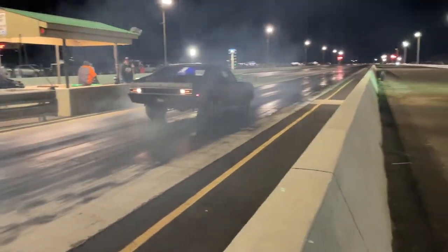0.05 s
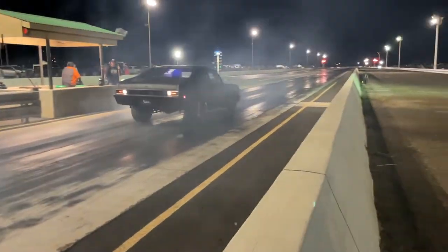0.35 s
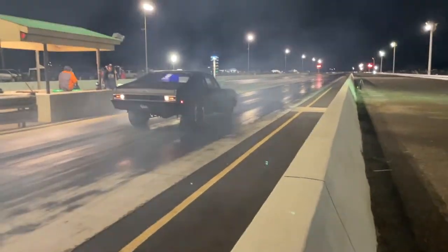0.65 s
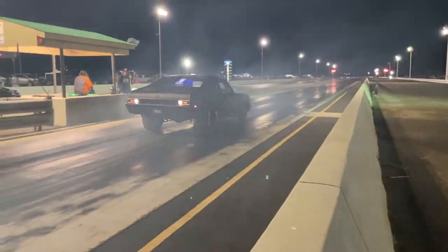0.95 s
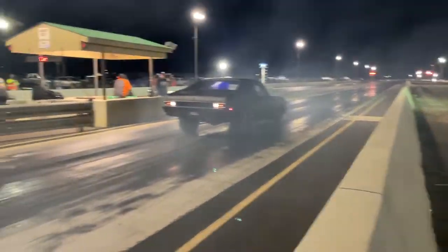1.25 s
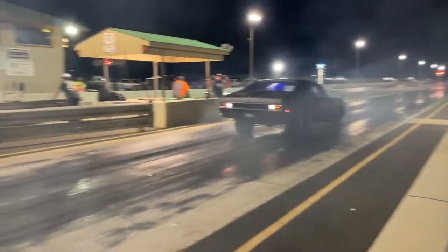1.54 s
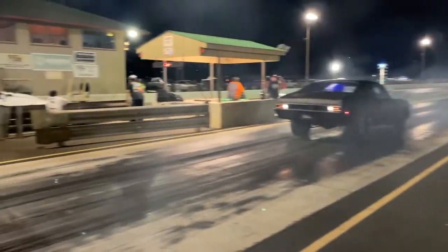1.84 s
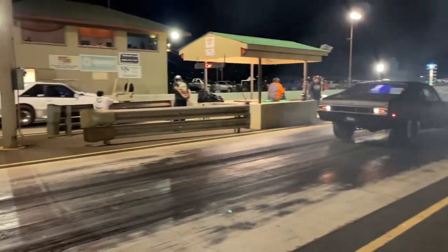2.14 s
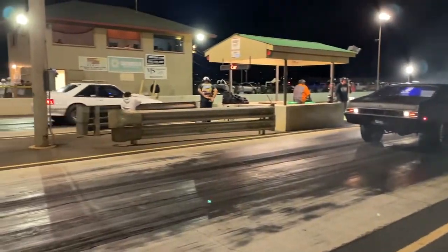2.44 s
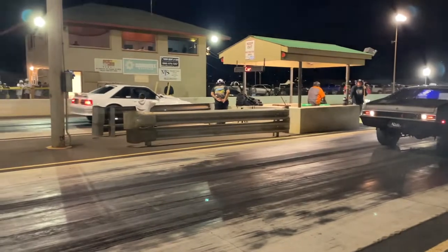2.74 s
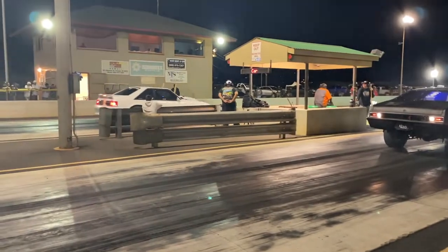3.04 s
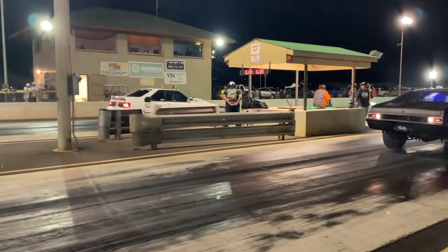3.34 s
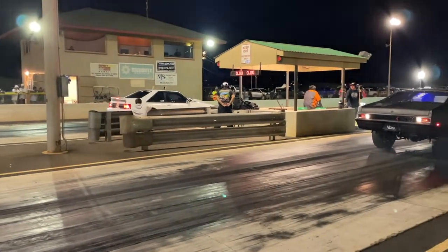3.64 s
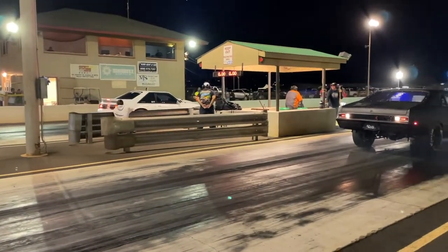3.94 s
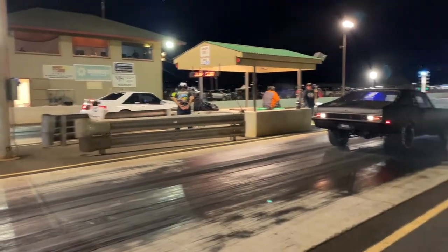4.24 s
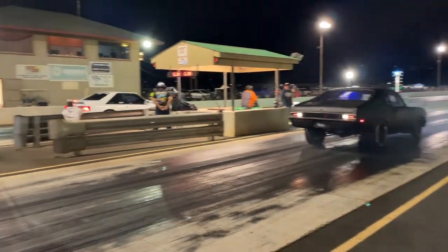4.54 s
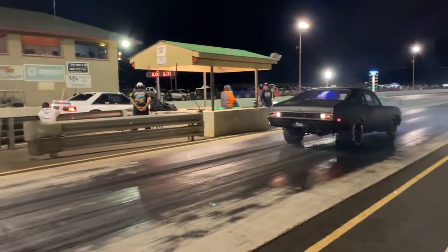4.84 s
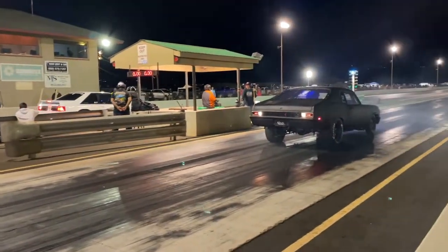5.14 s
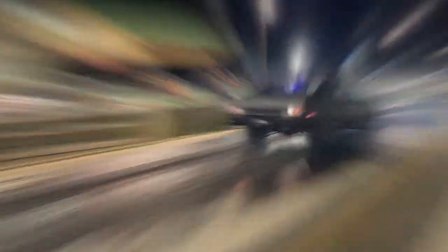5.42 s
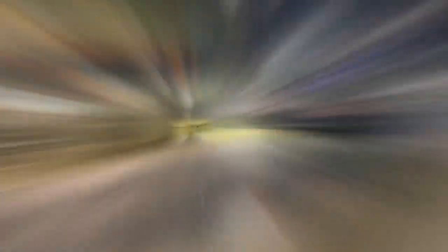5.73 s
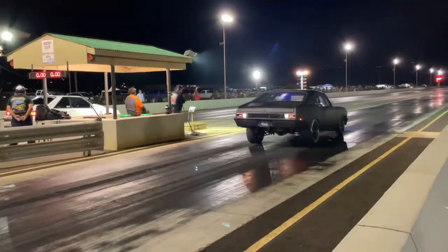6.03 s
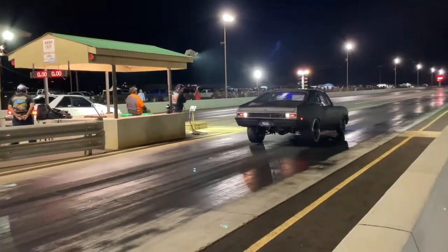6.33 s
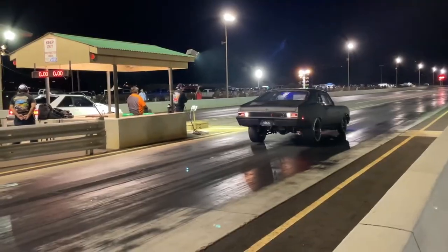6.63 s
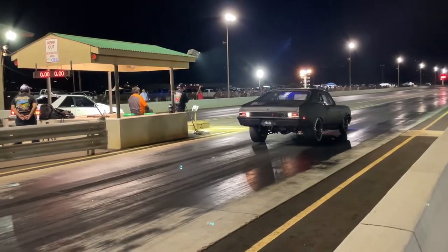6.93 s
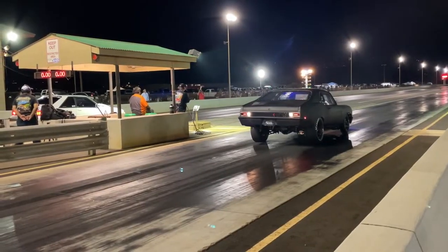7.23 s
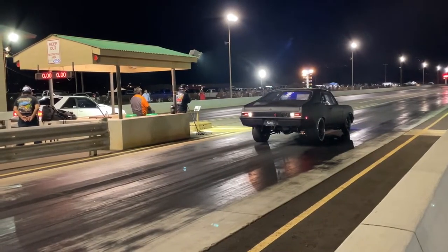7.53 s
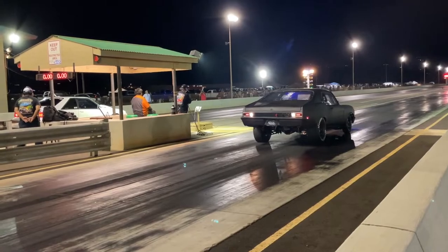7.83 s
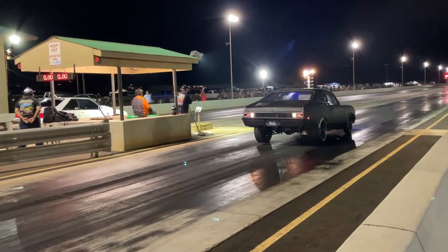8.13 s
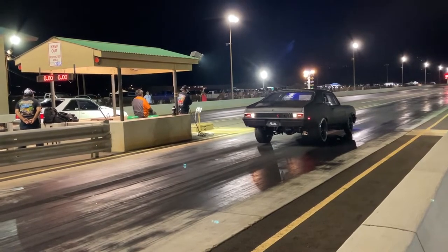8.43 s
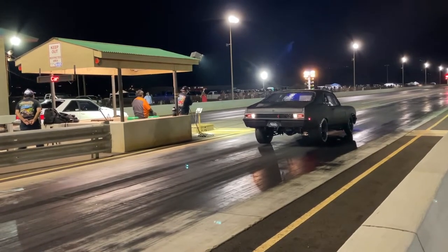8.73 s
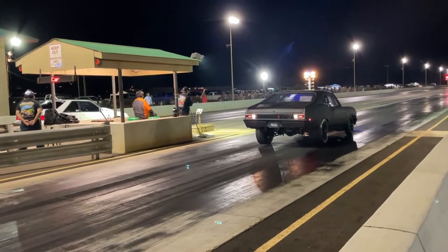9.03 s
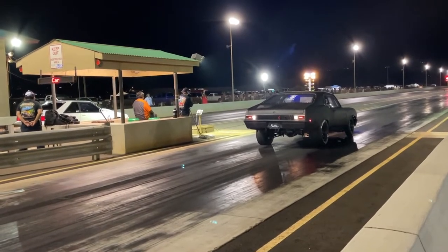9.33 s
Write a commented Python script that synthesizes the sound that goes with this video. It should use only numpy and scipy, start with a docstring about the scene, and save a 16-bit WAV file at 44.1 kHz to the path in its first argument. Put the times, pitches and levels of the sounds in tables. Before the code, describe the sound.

A lumpy V8 idle booms from the open pipes of a drag car, heard from the trackside wall, its speed wandering and its throb dropping out in brief misfires. At about 0.5 seconds a second car blips its throttle, rising quickly and coasting down with a rasp. It blips again at about 2.6 seconds, a little higher and louder, with a few sharp spits. Two very faint, thin squeals follow between 3 and 3.5 seconds. From about 3.7 seconds the idle builds, with more puffing gas and light ticking spits. At about 5.5 seconds the exhaust starts popping and by 6 seconds is much louder: rapid, uneven cracks, over ten a second, each with a rasp, a thump and a throaty roar. This crackling continues over the deep throb until the end, near 9.6 seconds. Walls and stands add a short outdoor echo throughout.

```python
"""A lumpy V8 idle booms from open pipes: two drag cars at the starting line at night, heard on a
phone at the trackside wall. One lopes and misfires; the other blips its throttle twice. From 5.5 s
the exhaust is much louder and pops about once an engine cycle. Each firing rings the pipes and lets
out a puff of gas; each pop cracks, rasps and roars. Walls and stands echo it back to the microphone."""
import sys
import numpy as np
from scipy import signal
from scipy.fft import rfft, irfft, next_fast_len
from scipy.io import wavfile
from scipy.ndimage import uniform_filter1d

SR = 44100
rng = np.random.default_rng(int(sys.argv[2]) if len(sys.argv) > 2 else 0)


def store_pcm(level_fs):
    """Save levels as 16-bit WAV."""
    pcm = np.round(np.clip(level_fs, -1, 1) * 32767).astype(np.int16)
    wavfile.write(sys.argv[1], SR, np.atleast_2d(pcm).T)


N = 422037
TIME = np.arange(N) / SR
BUILD_S = (3.7, 5.64)  # gas and spits build up over this span

# low and upper resonance of the idling car's pipes (frequency [Hz], gain [dB])
BOOM = [(25, -58.5), (45, -39), (60, 3), (74, 3), (88, 2.5), (112, 3.5), (145, -3), (185, -20),
        (230, -62.5), (400, -63)]
BARK = [(150, -52), (210, -11), (250, 2.5), (305, 2.5), (355, -4.5), (420, -13.5), (510, -45), (800, -35),
        (2000, -83)]
# ring of the headers and of the pipe mouths (centre [Hz], width [Hz], gain [dB])
HEADER_RINGS = [(526, 35, 6), (721, 59, 8), (845, 31, 6), (927, 40, 6.5), (1033, 39, 5.5), (1310, 74, -3),
                (2056, 88, 7.5), (3070, 58, 6.5), (3970, 100, 2), (6200, 790, 5)]
MOUTH_RINGS = [(635, 30, -13), (773, 85, 12.5), (823, 98, 2.5), (1120, 67, 5.5), (1450, 120, -10),
               (1910, 99, 10.5), (2100, 140, -18), (2393, 160, 9.5), (5880, 420, 7.5)]
# pops in the pipes, levels relative (time [s], crack [dB], rasp [dB], roar [dB], cavity tone [Hz])
POPS = [(5.5741, -30, -33.5, -34.0, 5700), (5.7243, -21, -28, -27, 5540), (5.768, -21, -38, -36, 3690),
        (5.8122, -20.0, -24.5, -26.5, 6060), (5.8701, -27.5, -35, -27, 6106), (5.914, -23, -32, -28, 3800),
        (5.9593, -17.5, -22.5, -21.5, 6150), (6.0458, -16.5, -28, -24.5, 3226),
        (6.1212, -21.5, -27.5, -23, 3927), (6.151, -37, -24.5, -34, 3430), (6.194, -20.0, -22, -18.5, 4300),
        (6.2767, -21.5, -31, -24.5, 3766), (6.35, -23, -22.5, -22, 3850), (6.4199, -10.5, -23, -20, 5660),
        (6.5077, -20, -30.5, -28, 3420), (6.569, -37, -25.0, -21, 6050), (6.6082, -39, -23.5, -20.5, 3193),
        (6.6524, -19, -24.0, -19.5, 5820), (6.737, -18, -30, -22.5, 5670), (6.768, -18, -28.5, -32, 5700),
        (6.7994, -42, -20.5, -25.5, 3340), (6.8877, -19.5, -24, -20, 5705),
        (6.976, -19, -24.5, -26.5, 3760), (7.0378, -38, -23.5, -20.5, 3100),
        (7.1297, -12, -23.5, -20.5, 6000), (7.215, -16.5, -22.5, -23, 3715),
        (7.2883, -19.5, -25.5, -26, 3914), (7.3636, -16.5, -26, -20.5, 5737), (7.4386, -27, -28, -25, 3074),
        (7.453, -20, -23.5, -31, 3690), (7.5198, -47, -27, -24.5, 3814), (7.601, -14, -22, -20.5, 5763),
        (7.6702, -23, -23.5, -44, 3817), (7.6844, -13, -30, -24, 6130), (7.834, -21.5, -26.5, -23, 3316),
        (7.8824, -18.5, -26, -22.5, 6290), (7.9238, -16, -28, -24.5, 3710),
        (7.9688, -25.5, -22, -19.5, 3470), (8.0646, -15, -21.5, -20, 5710),
        (8.1359, -24, -25.5, -22.0, 3030), (8.15, -13.5, -34, -45, 5540), (8.19, -17.5, -29, -24.5, 3370),
        (8.3045, -14, -24.0, -24, 4965), (8.3543, -19, -22.5, -28, 5180), (8.398, -32, -21.5, -24, 4130),
        (8.484, -26, -26.5, -22.5, 3710), (8.5118, -17, -28, -29, 3080), (8.5419, -16, -25, -23.5, 3095),
        (8.5837, -23, -25, -25, 3840), (8.669, -19, -28.5, -26.5, 4180), (8.749, -19, -23, -22, 3468),
        (8.776, -16, -20.5, -21.5, 3175), (8.8508, -20.5, -26, -27, 4430),
        (8.9112, -22.5, -24.5, -23, 4240), (8.9392, -21, -24, -21.5, 3940), (8.983, -17, -27, -23.5, 6100),
        (9.0094, -15.5, -29, -32.5, 3162), (9.0813, -27.5, -26.5, -24.5, 3120),
        (9.1393, -21.5, -22.5, -21, 4120), (9.214, -13.5, -27.5, -25, 3490),
        (9.242, -14.5, -29, -24.5, 6540), (9.3008, -36, -22.5, -20.5, 3023),
        (9.37, -24.5, -23, -21.5, 3710), (9.3961, -17.5, -29, -25, 3660), (9.438, -21, -33, -25, 6120),
        (9.4649, -14.5, -27.5, -25.5, 3070), (9.5408, -35.5, -25.5, -26, 3178)]


def undb(db):
    """Decibels to gain."""
    return np.exp(np.asarray(db) * np.log(10) / 20)


def curve(rows):
    """The columns of a timed table at every sample."""
    times, *columns = np.transpose(rows)
    return [np.interp(TIME, times, column) for column in columns]


def ramp(start_s, length_s):
    """From 0 to 1 in a straight line."""
    return np.clip((TIME - start_s) / length_s, 0, 1)


def wander(rate_hz):
    """Random values joined by straight lines; spread near 1."""
    return np.interp(TIME * rate_hz, np.arange(256), rng.standard_normal(256))


def ragged(rough_db, size=90):
    """Noise of unit power in uneven spurts."""
    x = rng.standard_normal(N)
    x *= undb(rough_db * np.repeat(rng.uniform(-1.36, 1.35, N // size + 1), size)[:N])
    return x / x.std()


def strikes(times, sizes):
    """One impulse at each time."""
    return np.bincount(np.maximum(times * SR, 0).astype(int), sizes, N)[:N]


def fade(x, decay_s):
    """Every impulse dies away exponentially."""
    return signal.lfilter([1], [1, -np.exp(-1 / (decay_s * SR))], x + 1e-18)


def steady(x, window_s):
    """Hold the running rms at 1."""
    size = int(window_s * SR)
    return x / np.sqrt(np.abs(uniform_filter1d(uniform_filter1d(x ** 2, size), size)) + 1e-12)


def colour(x, spectrum, rings=(), size=8192):
    """Causal filter of unit power: a smooth spectrum with resonant peaks and dips."""
    f = np.maximum(np.arange(size // 2 + 1) * SR / size, 1)
    hz, db = np.transpose(spectrum)
    rings_db = sum(peak / (1 + (2 * (f - centre) / width) ** 2) for centre, width, peak in rings)
    cepstrum = irfft(np.log(undb(np.interp(np.log(f), np.log(hz), db) + rings_db)))
    response = irfft(np.exp(rfft(2 * cepstrum[:size // 2], size)))  # minimum phase
    return signal.oaconvolve(x, response / np.linalg.norm(response))[:N]


def firings(hz, load, jitter_s, scatter_db, pair_lag_s=0):
    """Times and sizes of the exhaust pulses: lumpy with the throttle shut, more even under load."""
    # eight cylinders in firing order (strength [dB], lag down the pipe [s])
    cylinders = np.array([(1, 0), (-2.5, .001), (0, .0007), (-1, 0), (-3.5, .0012), (1, 0), (-1.5, .0004),
                 (-1, .0009)])
    count = np.cumsum(hz) / SR
    index = np.arange(int(count[-1]))
    times = np.interp(index, count, TIME)
    lope = np.interp(times, TIME, 1 - .15 * load)
    slowness = np.minimum(90 / np.interp(times, TIME, hz), 1)
    strength_db, lag = cylinders[index % len(cylinders)].T
    lag = lag + pair_lag_s * (index // 2 % 2)  # every other pair leaves by a longer pipe
    late, strong = np.clip(rng.standard_normal((len(index), 2)).T, -2, 1.5)
    sizes = undb(lope * (strength_db + scatter_db * strong))
    return times + lope * slowness * (lag + jitter_s * late), sizes


def idling_engine(hunt_share=.016, misfire_db=-18, width_s=.012, lead_s=.014):
    """Times and sizes of firings at a hunting idle; the one or two just before a dropout barely burn."""
    # engine speed (time [s], firing rate [Hz])
    speed = [(2.9, 83.54), (3.35, 76.56), (3.42, 80.9), (3.88, 83.23), (4.18, 78.3), (5.03, 94.2),
             (5.18, 80.6), (5.3, 91.75), (7.19, 84.16), (8.47, 72.6), (8.73, 74.18), (8.81, 85.4),
             (8.98, 93.4), (9.57, 94.4)]
    # misfires, where the throb drops out (time [s])
    dropouts = [.105, .411, 1.363, 1.606, 2.464, 3.169, 5.442, 5.706, 5.816, 5.9, 6.084, 6.332, 6.522, 6.72,
                6.87, 7.019, 7.267, 7.392, 8.095, 8.326, 8.713, 9.369]
    hz = curve(speed)[0] * (1 + hunt_share * wander(rate_hz=11))
    times, sizes = firings(hz, np.zeros(N), jitter_s=.00093, scatter_db=4)
    misfire = np.exp(-((times[:, None] + lead_s - np.array(dropouts)) / width_s) ** 2).max(axis=1)
    return times, sizes * undb(misfire_db * misfire)


def pipes(pulses, boom_shape, bark_shape, boom_db, bark_db, window_s, top_hz=2500):
    """The pulses of an engine ring the two lowest resonances of its exhaust."""
    boom = steady(colour(pulses, boom_shape), window_s) * undb(boom_db)
    bark = steady(colour(pulses, bark_shape), window_s) * undb(bark_db)
    return signal.sosfilt(signal.butter(2, top_hz, fs=SR, output="sos"), boom + bark)


def gas(pulses, load, swell_db, rush=.78, edge=.34, puff_db=2, blast_db=8, surge_db=2.5):
    """A puff of turbulence follows each firing; at open throttle the pulses steepen into a rasp."""
    # gas leaving the pipes, throttle shut and open (frequency [Hz], gain [dB])
    puff_shape = [(250, 4), (480, 4.5), (640, -0.5), (730, 2.5), (1080, 2), (1480, -5), (1780, -7.5),
                  (2130, -8.5), (2600, -9.5), (4200, -12.5), (6300, -18), (9500, -21), (13500, -34.5),
                  (15500, -34)]
    blast_shape = [(250, 3), (480, 6.5), (740, 5.5), (1080, 8.5), (1480, 0), (1780, -1.5), (2130, 1),
                   (2600, -9.5), (4200, -9.5), (6500, -11), (10000, -15), (13500, -34), (15500, -48)]
    throb = steady(fade(pulses, decay_s=.0073), .17)
    flow = steady((throb + rush) * ragged(2.35), .48)
    fronts = steady(fade(np.diff(pulses, prepend=0), decay_s=.00094), .16)
    puffs = undb(puff_db) * steady(colour(flow, puff_shape, HEADER_RINGS), .13)
    blast = undb(blast_db) * steady(colour(flow + edge * fronts, blast_shape), .12)
    surge = undb(surge_db * np.minimum(wander(rate_hz=20), 1))  # the idle hunts, so the gas surges
    level_db = -45.5 + np.interp(TIME, BUILD_S, [0, 7]) + swell_db
    return undb(level_db) * ((1 - load) * surge * puffs + load * blast)


def spits(times, overrun_db, base_db=-46.5, scatter_db=5, growth_db=4):
    """One idle firing in four spits faintly, louder on the overrun and late on; a few tick sharply."""
    # the sharpest spits (time [s], relative level [dB])
    ticks = [(1.5455, -36), (1.773, -33.5), (1.9563, -37), (2.3651, -32.5), (2.642, -22), (2.696, -24),
             (2.802, -26), (4.0812, -32), (4.5727, -35), (4.756, -32), (4.92, -33), (5.083, -30),
             (5.411, -29.5), (5.4887, -25)]
    # hiss of a spit (frequency [Hz], gain [dB])
    spit_shape = [(1000, -17), (4000, -5), (6300, -4), (9500, -9), (12500, -16), (15500, -14)]
    chance, strength = rng.random((len(times), 2)).T
    level_db = base_db + scatter_db * (2 * strength - 1) + np.interp(times, BUILD_S, [0, growth_db])
    level_db += np.interp(times, TIME, overrun_db)
    tick_times, tick_db = np.transpose(ticks)
    hits = strikes(times, (chance < 1 / 4) * undb(level_db)) + strikes(tick_times, undb(tick_db - 6))
    return colour(fade(hits, decay_s=.0071) * rng.standard_normal(N), spit_shape, HEADER_RINGS)


def blips(idle_hz=100.8, open_s=.052, close_s=.036, fill_s=.15, run_on_s=.03):
    """The second car revs up and coasts down; its exhaust swells, then rasps on the overrun."""
    # throttle blips (start [s], held [s], top firing rate [Hz], coasting time constant [s],
    # swell at full load [dB], overrun rasp [dB], its peak after the throttle shuts [s])
    throttle_blips = [(.45, .15, 235, .2, 13, 5, 0.1), (2.565, .15, 260.2, .28, 15.5, 9.5, .105)]
    hz, load, swell_db, overrun_db = idle_hz, 0, 0, 0
    for start, held, top_hz, coast_s, top_db, rasp_db, overrun_s in throttle_blips:
        coasting = np.maximum(TIME - start - held, 0)
        climb = ramp(start, held + run_on_s) ** 1.7  # runs on until the manifold empties
        speed = climb * np.exp(-np.maximum(coasting - run_on_s, 0) / coast_s)
        throttle = ramp(start, open_s) - ramp(start + held, close_s)
        push = throttle * np.sin(np.pi / 2 * ramp(start, fill_s)) ** 1.03  # the manifold fills
        overrun = coasting / overrun_s
        hz += (top_hz - idle_hz) * speed
        load += throttle
        swell_db += top_db * np.maximum(.67 * speed, push)
        overrun_db += rasp_db * overrun * np.exp((1 - overrun ** 2) / 2)
    return hz, np.clip(load, 0, 1), swell_db, overrun_db


def growl(pulses, load, swell_db, base_db=-29):
    """Under load the firings sweep up into the resonance of the collectors."""
    # resonance of the revving car's collectors (frequency [Hz], gain [dB])
    collectors = [(90, -40), (150, -0.5), (195, 11.5), (240, 8), (330, 6.5), (480, -36.5)]
    return load * undb(base_db + swell_db) * steady(colour(pulses, collectors), .028)


def squeals(waver=.0031):
    """A car rolls up with faint, thin tones that swell, sag in pitch and fade."""
    # squeals (start [s], length [s], pitch [Hz], glide [Hz], level [dB])
    tones = [(3.072, 0.16, 1420, -35, -50), (3.412, .11, 1920, -59, -50)]
    out = 0
    for start, length, hz, glide_hz, db in tones:
        along = ramp(start, length)
        pitch = (hz + glide_hz * along) * (1 + waver * wander(rate_hz=25))
        out += undb(db) * np.sin(np.pi * along) * np.sin(2 * np.pi * np.cumsum(pitch) / SR)
    return out


def flare(levels_db, attack_s, decay_s):
    """Envelope of one part of the pops: each swells to its level and dies away."""
    times = np.transpose(POPS)[0] - .0005
    power = fade(fade(strikes(times, undb(levels_db) ** 2), attack_s), decay_s)
    unit_peak = fade(fade(signal.unit_impulse(SR // 10), attack_s), decay_s).max()
    return np.sqrt(power / unit_peak)


def drift(x, depth_s=.0009, rate_hz=16):
    """Gusts of hot gas bend the ring of the pipes up and down by a few percent."""
    return np.interp(TIME + depth_s * wander(rate_hz), TIME, x)


def cracks(sputter_lead_s=.002, slap_delay_s=.01):
    """Fuel sputters, bursts with a crack, then rasps and rings; the wall slaps a duller crack back."""
    # the splintering crack and the rasp behind it (frequency [Hz], gain [dB])
    crack_shape = [(500, -19), (1500, -4), (3000, -5), (5700, 4), (7500, -0.5), (9500, 1), (12000, 0),
                   (14000, -4), (15500, -14)]
    rasp_shape = [(200, -8.5), (1500, -1), (2600, -6), (3300, 3.5), (5800, -10), (7000, -11.5),
                  (12000, -12.5), (15000, -21)]
    _, crack_db, rasp_db, _, _ = np.transpose(POPS)
    burst = flare(crack_db, attack_s=.0008, decay_s=.00092)
    rasp = undb(-1) * flare(rasp_db, attack_s=.0023, decay_s=.018)
    sputter = undb(-13) * np.interp(TIME + sputter_lead_s, TIME, burst)
    slap = undb(-9) * np.interp(TIME - slap_delay_s, TIME, burst)
    crack = colour((burst + sputter) * ragged(4.9), crack_shape)
    tearing = colour(np.hypot(rasp, slap) * ragged(2.45), rasp_shape, MOUTH_RINGS)
    return drift(tearing) + undb(-1) * (crack + cavities())


def cavities(attack_s=.00088, ring_s=.0062, width_hz=280, size=4096):
    """Each pop sets one cavity ringing briefly at a tone of its own."""
    out, t = np.zeros(N + size), TIME[:size]
    envelope = (1 - np.exp(-t / attack_s)) * np.exp(-t / ring_s)
    for at, crack_db, rasp_db, _, hz in POPS:
        burst = rng.standard_normal(size) * envelope
        ring = signal.lfilter(*signal.iirpeak(hz, hz / width_hz, fs=SR), burst)
        ring *= np.linalg.norm(envelope) / np.linalg.norm(ring)
        start = int(at * SR)
        out[start:start + size] += undb((crack_db + rasp_db) / 2) * ring
    return out[:N]


def afterburn(pulses, bed_db=-36, rise_s=.36, rush=.64):
    """Behind each pop the flame swells into a throaty roar, puffed out by the next firings."""
    # roar of the flame (frequency [Hz], gain [dB])
    roar_shape = [(25, -3), (50, 15), (130, -7), (210, 8.5), (480, -2), (1050, -2), (1500, -4), (2600, -21),
                  (9000, -47)]
    _, _, _, roar_db, _ = np.transpose(POPS)
    bed = undb(bed_db) * ramp(BUILD_S[1], rise_s)
    heat = np.hypot(flare(roar_db, attack_s=.011, decay_s=.017), bed)
    throb = steady(fade(pulses, decay_s=.0055), .02)
    flow = steady((throb + rush) * rng.standard_normal(N), .019)
    return drift(colour(heat * flow, roar_shape, MOUTH_RINGS))


def thumps(boom_gain_db=31, bark_gain_db=27):
    """Each pop also makes the pipes boom and bark."""
    times, _, _, roar_db, _ = np.transpose(POPS)
    hits = strikes(times, undb(roar_db))
    return undb(boom_gain_db) * colour(hits, BOOM) + undb(bark_gain_db) * colour(hits, BARK)


def trackside(x, t60_s=.73, treble_t60_s=.089, wet_db=-15, delay_s=.0038, split_hz=2500):
    """Direct sound plus echoes off the farther walls and stands; the bass is more alike on both sides."""
    t = TIME[:SR]
    scatter = rng.standard_normal((2, SR))
    bass_spread = signal.sosfilt(signal.butter(2, 500, fs=SR, output="sos"), scatter[0] - scatter[1])
    scatter += np.array([[-.5], [.5]]) * bass_spread
    dull = signal.sosfilt(signal.butter(1, split_hz, fs=SR, output="sos"), scatter)
    treble = .5 * (scatter - dull) * undb(-60 * t / treble_t60_s)
    decay = undb(-60 * t / t60_s)
    echoes = (dull * decay + treble) * (t > delay_s) / np.linalg.norm(decay)
    return x + undb(wet_db) * signal.fftconvolve(x[None], echoes, axes=1)[:, :N]


def near_reflections(x, level_db=-10, decay_s=.0089, above_hz=1000, size=1024):
    """Car body, tarmac and wall close by return the treble in milliseconds, differently on each side."""
    scatter = rng.standard_normal((2, size)) * np.exp(-TIME[:size] / decay_s)
    scatter = signal.sosfilt(signal.butter(2, above_hz, "high", fs=SR, output="sos"), scatter)
    scatter /= np.linalg.norm(scatter[0])
    return undb(level_db) * signal.oaconvolve(x[None], scatter, axes=1)[:, :N]


def scene():
    """Both cars on the line, as their sound reaches the trackside wall."""
    # pipe note of the idling car (time [s], boom [dB], bark [dB])
    idle_levels = [(0, -22.5, -40.5), (.85, -32, -32.5), (2.4, -24, -36.5), (3.5, -19, -35),
                   (4.7, -19, -29.5), (5.4, -22, -29.5), (5.95, -10.5, -25.5), (7.8, -10.5, -27.5),
                   (8.4, -11.5, -26), (8.9, -9, -25.5)]
    # low and upper resonance of the revving car's pipes (frequency [Hz], gain [dB])
    rev_boom = [(25, -59.5), (50, -33), (75, -6), (103, 9), (135, -1), (175, -1), (215, -10.5), (260, -17),
                (420, -68.5)]
    rev_bark = [(150, -49.5), (210, -10.5), (250, 1.5), (320, 3), (390, -6.5), (460, -16.5), (560, -25),
                (800, -29.5), (2000, -79.5)]
    idle_times, idle_sizes = idling_engine()
    idler = strikes(idle_times, idle_sizes)
    boom_db, bark_db = curve(idle_levels)
    exhaust = pipes(idler, BOOM, BARK, boom_db, bark_db, window_s=.46)

    rev_hz, load, swell_db, overrun_db = blips()
    revver = strikes(*firings(rev_hz, load, jitter_s=.00087, scatter_db=3.5, pair_lag_s=.0017))
    rev_boom_db = -26.5 + swell_db * (.62 * load - .02 * (1 - load))  # grows under load, sags off it
    rev_bark_db = -35 + swell_db + .51 * overrun_db
    exhaust += pipes(revver, rev_boom, rev_bark, rev_boom_db, rev_bark_db, window_s=.042)
    exhaust += growl(revver, load, swell_db)

    rev_share = undb(rev_bark_db - bark_db)  # the louder bark leads the pulsing of gas and flame
    pulses = (idler + rev_share * revver) / np.hypot(1, rev_share)
    backfire = cracks() + afterburn(pulses) + thumps()
    exhaust += gas(pulses, load, swell_db + overrun_db) + spits(idle_times, .63 * overrun_db) + backfire
    return trackside(exhaust + squeals()) + near_reflections(exhaust)


def record(dry, bass_lean_db=-1.6, treble_lean_db=.54, bass_lead_rad=.18, ceiling=1.15, top_hz=15900):
    """The phone's two microphone ports differ in phase and level; peaks are rounded, the top is cut."""
    # phase lead of the left port, before the added bass lead (frequency [Hz], lead [rad])
    port_lead = [(0, 0), (520, 0.41), (1380, 0.35), (1980, 1.2), (2330, 0.86), (2930, -0.26), (6200, 0.65),
                 (6890, 0), (7750, -3), (9390, -4.5), (10900, -6), (12300, -7.5), (14100, -9), (16000, -22)]
    size = next_fast_len(N + SR)
    f = np.arange(size // 2 + 1) * SR / size
    lean_db = np.interp(f, [300, 600], [bass_lean_db, treble_lean_db])
    lead = np.interp(f, *np.transpose(port_lead)) + np.interp(f, [100, 400], [bass_lead_rad, 0])
    left = undb(lean_db / 2) * np.exp(.5j * lead)
    stereo = irfft(rfft(dry, size) * np.array([left, 1 / left]), size)[:, :N]
    rounded = ceiling * np.tanh(stereo / ceiling)
    return signal.sosfilt(signal.ellip(8, .2, 70, top_hz, fs=SR, output="sos"), rounded)


dry = scene()
out = record(dry)
store_pcm(out)
```